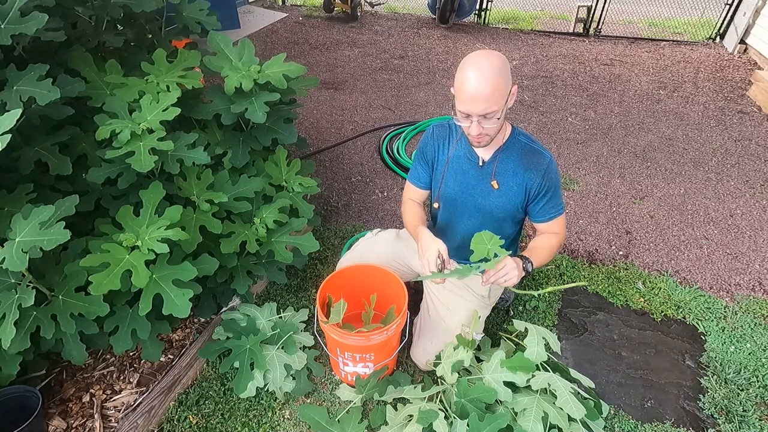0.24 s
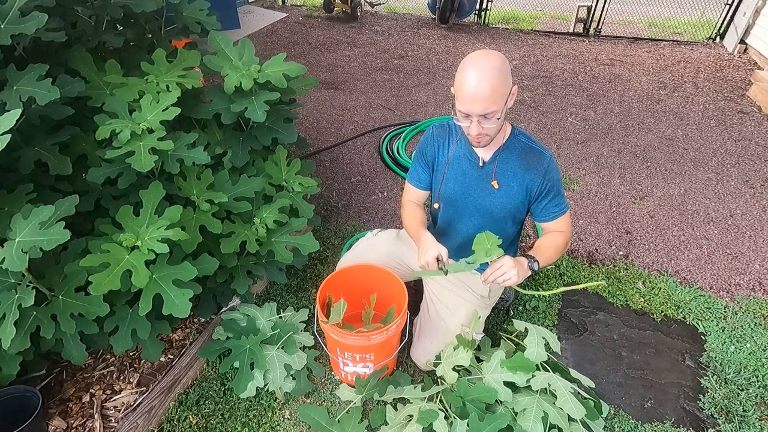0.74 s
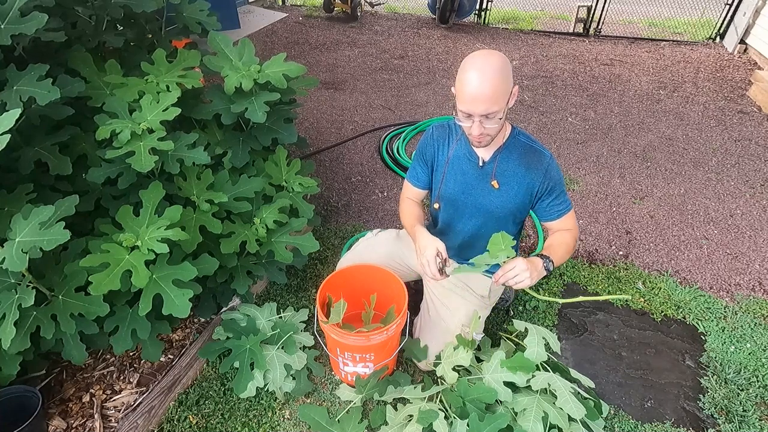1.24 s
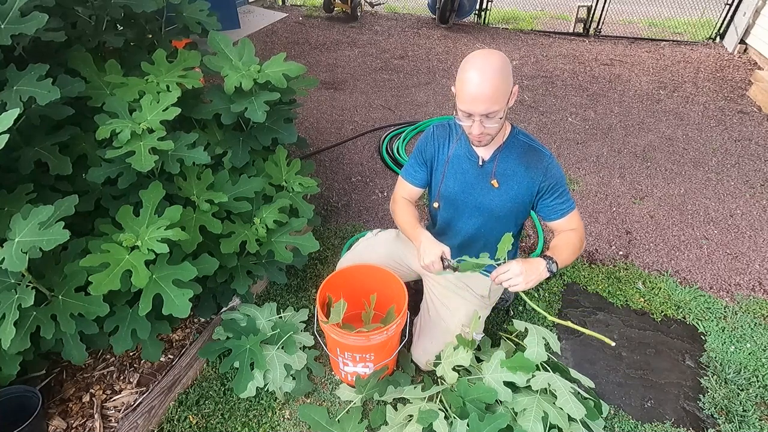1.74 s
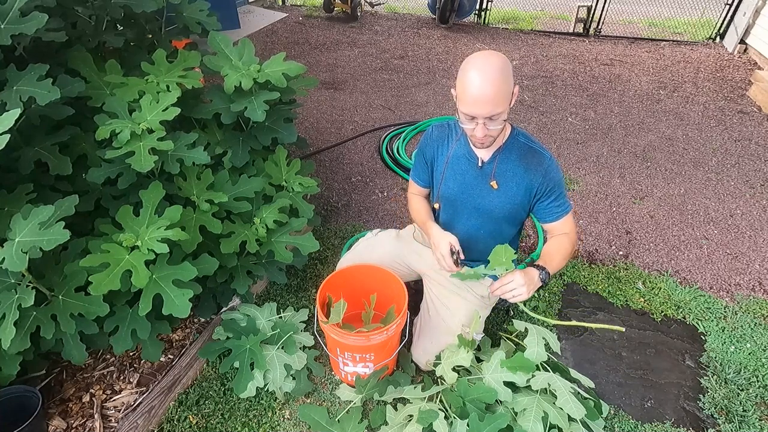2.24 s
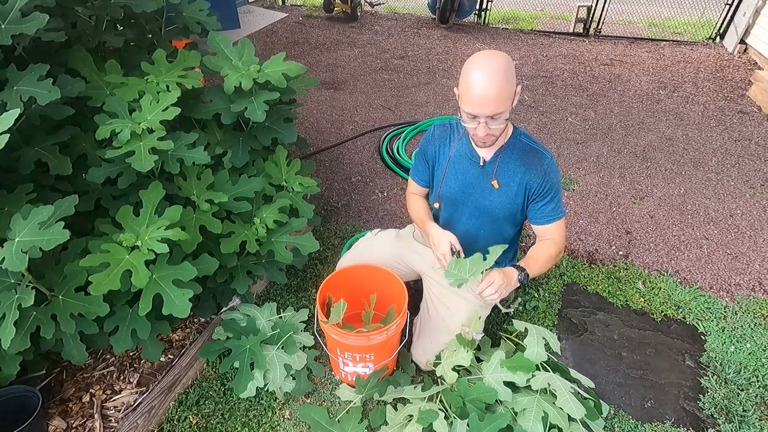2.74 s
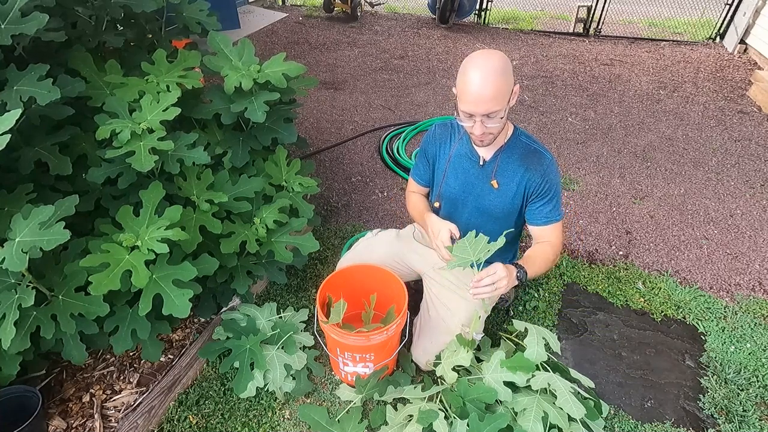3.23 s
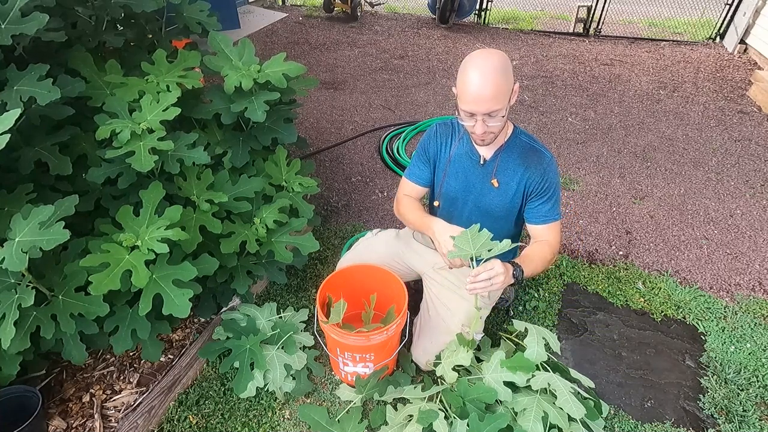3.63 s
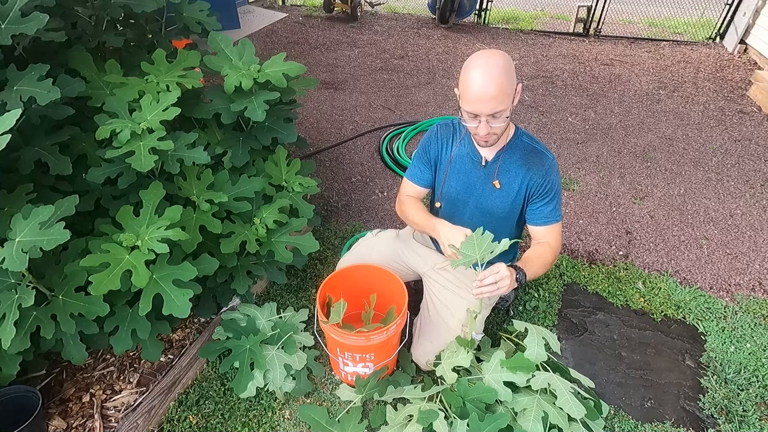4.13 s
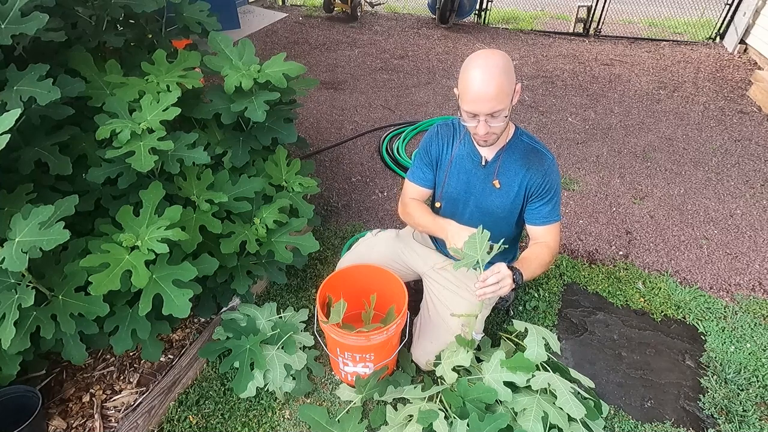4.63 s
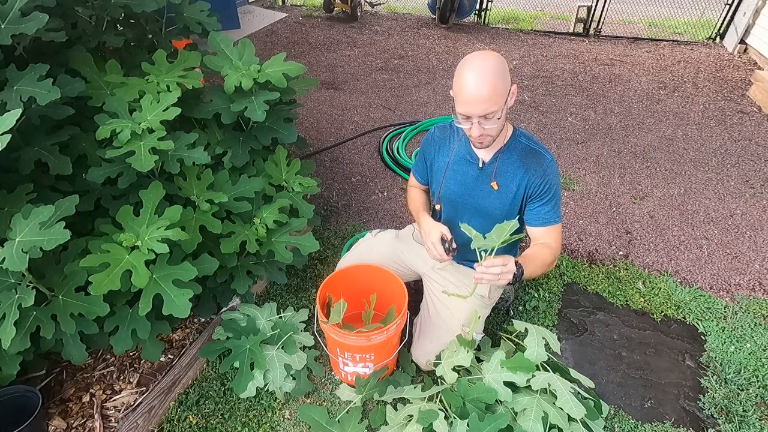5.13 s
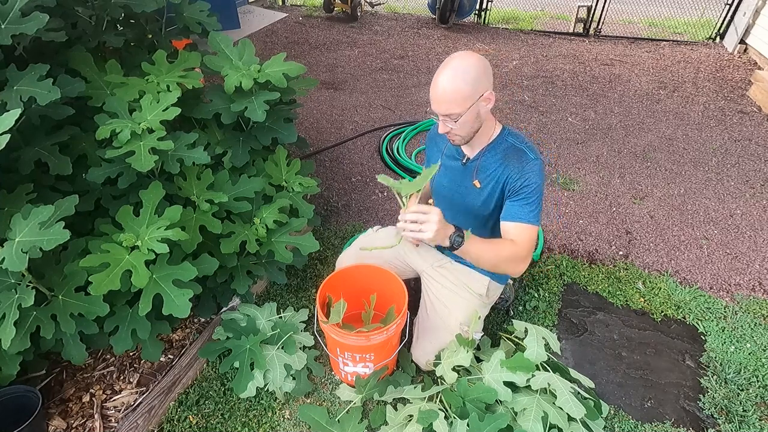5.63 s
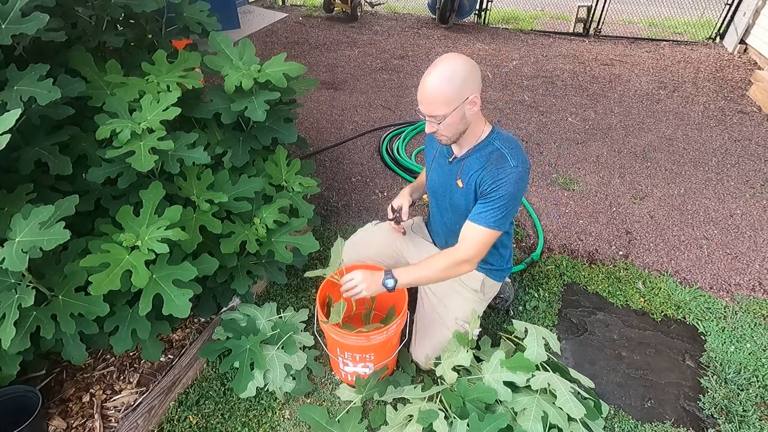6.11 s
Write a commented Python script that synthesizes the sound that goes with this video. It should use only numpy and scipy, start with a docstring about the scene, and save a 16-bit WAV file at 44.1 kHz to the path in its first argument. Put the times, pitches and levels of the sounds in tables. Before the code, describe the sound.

A steady high shimmer of crickets, with one rapid chirper, fills a garden over low far traffic. Close up, steel shears snap through green cuttings, some strokes hard enough to flatten against the microphone's limit. Cut pieces drop with dull little taps and leaves hiss briefly. The last second and a half has only faint leaf rustling, a small tap and the insects. Dry, open air, centred.

```python
"""Hand shears in a garden

Close to one small microphone, shears snip green cuttings: clusters of steel contacts ring the blades and handle,
the hardest flattening at full scale. Cut stems tap down as soft pushes; brushed leaves hiss in clumps of cracks.
Crickets trill and chirp in tone pulses before a blurred far chorus; shaped noise makes the distant road.
"""
import sys
import numpy as np
from scipy import signal
from scipy.fft import rfft, irfft, next_fast_len
from scipy.io import wavfile
from scipy.ndimage import map_coordinates

SR = 44100
rng = np.random.default_rng(int(sys.argv[2]) if len(sys.argv) > 2 else 0)


def persist_wave(psi):
    """Save psi, clipped to +-1, as 16-bit WAV."""
    counts = np.round(np.clip(psi, -1, 1) * 32767).astype(np.int16)
    wavfile.write(sys.argv[1], SR, np.atleast_2d(counts).T)


N = 280917

# Blade and stop contacts of the shears: (time [s], level [dB], handle ring re level [dB],
# grip [0 loose to 1 tight], chatter length [ms])
CONTACTS = [(.0955, -14, 3, 0.57, 1.9), (.0973, -10, -12, .3, 0.82), (0.0995, -5.5, -10.5, 0.55, 0.76),
            (0.8609, -7, -9, .3, 1.3), (0.8643, 11, -8, 0.9, 0.79), (.8702, -2, -4, 0.88, 0.47),
            (0.875, -13, 4.5, 0.99, 0.8), (1.0415, -26, 8.5, .05, 2), (1.8775, -22, 2, .2, 1.1),
            (1.88, -18, 0, .4, 1.2), (1.8815, 7.5, -17, 0.89, 2.3), (1.8855, -9.5, 3, 0.6, 1.2),
            (1.888, -5.5, -4, .02, 1.5), (1.8917, -9.5, -2, 1, 1.7), (1.9017, -32, 16, .6, 0.48),
            (3.998, 8, -18.5, 0.56, 2), (4.001, -4, -2, 0.87, 1.65), (4.0035, -10.5, 3, 0.78, 1.2),
            (4.006, -8, -5, 1, 0.77), (4.0084, -26, 4, .8, 0.91), (4.1787, -20, 6, .3, 2),
            (4.1812, -15.5, 6.5, .4, 0.87), (4.1833, -2.5, -3.5, 0.61, 1.66), (4.63, -20, -10, .2, 1.5),
            (4.6728, -10, -10, 1, 0.6), (4.674, 7.5, -14, .98, 2), (4.678, -15, 6, 0.77, 0.77),
            (4.68, -2, 0.5, 0.92, 0.74), (4.8196, -18, 0, .02, 0.68), (4.8553, -12.5, -1, 0.24, 2.1),
            (4.8593, -1, -8, 0.9, 1.9)]


def amp(db):
    """Decibels to amplitude."""
    return 10 ** (np.asarray(db) / 20)


def unit(x):
    """x scaled to rms 1."""
    return x / np.sqrt(np.mean(x ** 2) + 1e-20)


def peak(x):
    """x scaled to peak 1."""
    return x / np.max(np.abs(x))


def noise(count=N):
    """White noise."""
    return rng.standard_normal(count)


def curves(rows):
    """One value per sample for each column after the time."""
    times, *columns = np.transpose(rows)
    return [np.interp(np.arange(N) / SR, times, column) for column in columns]


def wobble(rate):
    """A smooth random curve, rate knots a second."""
    knots = noise(int(N * rate / SR) + 4)
    return map_coordinates(knots, [np.arange(N) * rate / SR])


def filtered(x, response):
    """x times a complex response of frequency."""
    size = next_fast_len(x.shape[-1] + 8192)
    spectrum = rfft(x, size) * response(np.fft.rfftfreq(size, 1 / SR))
    return irfft(spectrum, size)[..., :x.shape[-1]]


def coloured(x, spectrum):
    """x shaped by (frequency [Hz], level [dB]) points on a log axis, rms 1."""
    points_hz, points_db = np.transpose(spectrum)

    def response(hz):
        return amp(np.interp(np.log(hz + 1), np.log(points_hz), points_db, -120, -120))

    return unit(filtered(x, response))


def resonant(x, peaks):
    """x through parallel (frequency [Hz], width [Hz], level [dB]) resonances of alternating sign."""
    def response(f):
        total = 0
        for k, (centre, width, db) in enumerate(peaks):
            damping = 1j * f * width
            total = total + (-1) ** k * amp(db) * damping / (centre ** 2 - f ** 2 + damping)
        return total

    return filtered(x, response)


def below(edge_hz):
    """A steep low-pass response."""
    return lambda hz: np.clip((edge_hz - hz) / 120, 0, 1)


def add(track, start_s, sound):
    """Mix sound into track at a time."""
    part = track[round(start_s * SR):][:len(sound)]
    part += sound[:len(part)]


def road():
    """Far traffic: deep rumble, a wavering engine drone and tyre hiss, each shaped noise."""
    # Traffic levels: (time [s], rumble [dB], drone [dB], tyre hiss [dB])
    traffic = [(0.0, -39.5, -44.5, -45), (0.7, -42.5, -42.5, -44.5), (1.4, -39.5, -47, -43.5),
               (1.98, -34, -44, -44), (2.6, -40.5, -42.5, -42.5), (3.2, -35.5, -36.5, -41.5),
               (3.6, -38, -40, -42.5), (3.9, -33.5, -36.5, -42), (4.2, -39.5, -38, -42),
               (4.65, -37.5, -32, -41), (5.11, -42, -39, -39.5), (5.8, -43, -43.5, -42.5),
               (6.1, -39, -39.5, -41.5), (6.37, -44, -38.5, -42.5)]
    # Spectra of the three parts: (frequency [Hz], relative density [dB])
    rumble_spectrum = [(8.8, -40), (15, -16), (27, -5), (43, 4.5), (100, -2.5), (130, -23), (220, -120)]
    drone_spectrum = [(47, -17), (80, -8.5), (119, 4.5), (146, -3.5), (189, -1), (264, -9), (450, -22.5),
                      (580, -39), (990, -120)]
    tyre_spectrum = [(180, -34), (300, -9.5), (395, -9.5), (569, -5), (621, -5), (893, 2), (1490, -3),
                     (2150, -15), (2660, -17.5), (4440, -29.5), (6000, -40), (7800, -52), (13200, -120)]
    rumble_db, drone_db, tyre_db = curves(traffic)
    rumble = amp(rumble_db + 2.1 * wobble(5.97)) * coloured(noise(), rumble_spectrum)
    drone = amp(drone_db + 2.05 * wobble(18)) * coloured(noise(), drone_spectrum)
    tyres = amp(tyre_db + 0.5 * wobble(9.6)) * coloured(noise(), tyre_spectrum)
    return rumble + drone + tyres


def crickets():
    """Wing strokes are short tone pulses: trills near by, one chirper, and a far chorus blurred to noise."""
    # The low crickets swell together: (time [s], mean level [dB], swell depth [dB])
    low_swell = [(0, -44.5, -0.5), (.9, -46, .5), (1.2, -46, 4), (1.55, -45.5, 2.5), (1.9, -46.5, 0.5),
                 (2.9, -44.5, 1), (4, -45.5, 2), (5.1, -45, 0), (5.5, -46, 1), (6.15, -43.5, 4),
                 (6.37, -45, 4)]
    # The high crickets: (time [s], level [dB])
    high_swell = [(0.0, -36.5), (0.9, -39.5), (1.25, -37), (1.88, -38.5), (2.3, -36.5), (4.24, -39),
                  (4.58, -37), (4.9, -40), (5.25, -36.5), (5.65, -41), (5.92, -37.5), (6.37, -40)]
    # Far chorus of each group: (frequency [Hz], relative density [dB])
    low_far = [(5900, -32), (6400, -17), (6900, -1.5), (7250, -1.5), (7550, -12), (7800, -32)]
    high_far = [(7300, -11), (7600, -12), (8000, -5.5), (8300, -4.5), (8600, -5.5), (8850, -12.5),
                (9000, -18), (9200, -29), (9700, -33)]
    # Near trilling crickets: (group [0 low, 1 high], pitch [Hz], pulse rate [1/s], level re group [dB])
    trills = [(0, 7045, 45, -4.5), (0, 7220, 39, -7), (1, 8250, 52.5, -6.5), (1, 8310, 54.5, -7),
              (1, 8550, 53, -23), (1, 9027, 53.6, -16)]
    # Phrases of the chirping cricket: (first chirp [s], chirps [count], spacing [s], level [dB])
    phrases = [(.028, 11, .0614, -33), (1.556, 52, .06104, -33)]
    swells_per_s, crest_s = 4.03, 1.19

    t = np.arange(N) / SR
    low_db, depth_db = curves(low_swell)
    swell_db = depth_db * np.cos(2 * np.pi * swells_per_s * (t - crest_s))
    group = amp([low_db + swell_db, *curves(high_swell)])
    out = amp(1.5) * group[0] * coloured(noise(), low_far)
    out += amp(-2) * group[1] * coloured(noise(), high_far)

    for which, hz, rate, db in trills:
        strokes = np.cumsum(rate * (1 + 0.0211 * wobble(3))) / SR + rng.random()
        gate = np.clip(np.sin(2 * np.pi * strokes) + 0.28, 0, None) ** 0.67
        tone = np.sin(2 * np.pi * hz * t + 2.0 * wobble(rate))  # phase wanders at about the stroke rate
        level = amp(db + 1.6 * wobble(3.18) + 1.7 * wobble(40))
        out += group[round(which)] * level * unit(gate * tone)

    u = np.arange(SR // 20) / SR
    shape = (u / .009) ** 2 * np.exp(2 - 2 * u / .009)  # crests at 9 ms
    for first, count, spacing, db in phrases:
        for k in range(int(count)):
            pitch_hz = 7395 + rng.normal(0, 2.3)
            tone = np.sin(2 * np.pi * pitch_hz * u + 2 * np.pi * rng.random())
            level = amp(db + rng.normal(0, 0.92))
            add(out, first + k * spacing - .004, level * shape * tone)  # onset 4 ms ahead of the listed time
    return out


def leaves():
    """Brushed or shaken leaves hiss in clumps of tiny cracks: a quick rise, a hold, a slower fall."""
    # Leaves brushed by the hands: (start [s], hold [s], crisp edges [dB], broad blades [dB])
    brushes = [(.445, .02, -58, -54), (0.487, 0.085, -59, -52.5), (.69, 0.0063, -63, -49),
               (0.845, .01, -58, -46), (0.919, .01, -46, -42), (1.026, .06, -44.5, -43.5),
               (1.245, .005, -62, -53), (1.445, .015, -60, -52.5), (1.6, .04, -58, -54),
               (1.76, .02, -63, -54), (1.915, .04, -50, -45), (2.025, .02, -54, -54),
               (2.052, .015, -45, -44.5), (2.085, 0.027, -45, -46), (2.33, 0.06, -59, -55),
               (2.735, .012, -51, -46), (2.786, .005, -51, -55), (2.86, .015, -55, -50),
               (2.926, .025, -49, -49), (3.2, 0.29, -60.5, -62), (4.623, 0.02, -53, -48),
               (4.82, .04, -45, -45), (5.045, .01, -58, -66), (5.29, .05, -59, -55), (5.4, .05, -62, -56),
               (5.55, .02, -62, -54), (5.83, .2, -62, -54.5), (6.07, .03, -60, -58), (6.35, .02, -58, -55)]
    # Thin leaf edges, then whole leaf blades: (frequency [Hz], relative density [dB])
    crisp_spectrum = [(6000, -40), (7500, -5), (11000, -4), (15600, -11), (15800, -60)]
    broad_spectrum = [(800, -45), (2000, 4.5), (4000, -5.5), (6500, -1.5), (8000, -40)]
    rise_db_per_s, fall_db_per_s = 900, 400
    hard_db = -10  # contacts above this shake the cutting's leaves
    shake_hold_s, shake_crisp_db, shake_broad_db = 0.016, -45.5, -41.5
    stir_crisp_db, stir_broad_db = -71, -59  # the bush stirs faintly throughout

    t = np.arange(N) / SR
    shakes = [(s, shake_hold_s, shake_crisp_db, shake_broad_db) for s, db, *_ in CONTACTS if db > hard_db]
    level_db = np.array([[stir_crisp_db], [stir_broad_db]]) + 3.5 * wobble(12)
    for start, hold, crisp_db, broad_db in [*brushes, *shakes]:
        rise_loss = rise_db_per_s * np.clip(start - t, 0, None)
        fall_loss = fall_db_per_s * np.clip(t - start - hold, 0, None)
        brush_db = np.array([[crisp_db], [broad_db]]) - rise_loss - fall_loss
        level_db = np.maximum(level_db, brush_db)
    crisp, broad = amp(level_db)
    cracks = noise() * amp(2.9 * wobble(320) + 1.4 * wobble(50))
    return coloured(cracks, crisp_spectrum) * crisp + coloured(cracks, broad_spectrum) * broad


def shears():
    """Contacts chatter and excite the blades; the handle rings lower: loose higher and shorter, tight longer."""
    # Blade resonances: (frequency [Hz], width [Hz], level [dB])
    blade_modes = [(3640, 360, -17.5), (6285, 880, -10), (6950, 540, -4.5), (7985, 770, -5),
                   (10640, 2700, -17.5), (12740, 230, -18), (14400, 1900, -29)]
    loose_hz, tight_hz = 2550, 2156  # handle pitch by grip
    loose_width_hz, tight_width_hz = 580, 130  # a narrower resonance rings longer

    out, t = np.zeros(N), np.arange(2048) / SR
    for s, db, handle_db, grip, ms in CONTACTS:
        handle_hz = np.interp(grip, [0, 1], [loose_hz, tight_hz])
        width_hz = np.interp(grip, [0, 1], [loose_width_hz, tight_width_hz])
        chatter = noise(len(t)) * np.exp(-(1000 * t / max(ms, .2)) ** 2)
        blades = peak(resonant(chatter, blade_modes))
        thin = resonant(chatter, [(2350, 5900, 0)])  # the steel alone sends out little bass
        handle = peak(resonant(thin, [(handle_hz, width_hz, 0), (3740, 450, -13)]))
        shock = noise(len(t)) * amp(-60 * t / 0.027)  # falls 60 dB in 27 ms
        jolt = peak(resonant(shock, [(346, 1470, 5.7), (1260, 1460, 7.2)]))
        jolt_db = 0.12 * db - 25.5  # hard blows jolt stem and palm
        add(out, s, amp(db) * (blades + amp(handle_db) * handle + amp(jolt_db) * jolt))
    return out


def yard(x):
    """Ground, fence and bushes return a short scattered tail."""
    t = np.arange(SR // 5) / SR
    tail = noise(len(t)) * amp(-60 * t / 0.032) * (t > .004)
    return signal.fftconvolve(x, tail / np.linalg.norm(tail))[:N]


def cuttings():
    """A cut stem's soft contact is one short low push with a puff of treble."""
    # Cut stems dropping on leaves and cloth: (time [s], level [dB], treble re level [dB], knock [Hz])
    taps = [(0.931, -28, -11, 1510), (1.0565, -19.5, -10.5, 920), (1.078, -10.5, -7, 2090),
            (1.0828, -12, -14.5, 1620), (1.086, -24, -17.5, 595), (1.383, -28, -14.5, 2000),
            (1.9135, -8.5, -14, 1960), (1.9167, -17.5, -15, 1700), (1.936, -36, -21.5, 500),
            (1.948, -29, -23.5, 446), (1.958, -33, -21.5, 490), (2.689, -29.5, -13.5, 696),
            (2.737, -31, 0, 1500), (5.239, -28, -13.5, 2200)]
    out, t = np.zeros(N), np.arange(1024) / SR
    for s, db, treble_db, knock_hz in taps:
        push = (1 + .5 * noise(len(t))) * amp(-60 * t / .0007)
        thud = peak(resonant(push, [(380, 350, -2), (knock_hz, knock_hz / 2, 0)]))
        burst = noise(len(t)) * amp(-60 * t / 0.026)
        puff = peak(resonant(burst, [(7640, 4300, 0)]))
        add(out, s, amp(db) * (thud + amp(treble_db) * puff))
    return out


def scene():
    """Shears and cuttings close by with their yard tail, then leaves, crickets and road, alike in both channels."""
    near = shears() + cuttings()
    mono = near + amp(-18) * yard(near) + leaves() + crickets() + road()
    return np.array([mono, mono])


def record(dry):
    """One microphone with its own hiss feeds both channels; the loudest contacts flatten at full scale."""
    # Microphone hiss: (frequency [Hz], relative density [dB])
    hiss_spectrum = [(2000, -8), (4000, -3), (10000, -1.5), (15650, -6), (15800, -60)]
    edge_hz, top_hz = 15870, 16880
    x = dry + amp(-60.0) * coloured(noise(), hiss_spectrum)
    x = filtered(x, lambda hz: np.maximum(below(edge_hz)(hz), amp(-24)))  # dulled above about 15.9 kHz
    x = x / (1 + np.abs(x) ** 8) ** (1 / 8)  # nearly straight until close to full scale
    return filtered(x, below(top_hz))


dry = scene()
out = record(dry)
persist_wave(out)
```